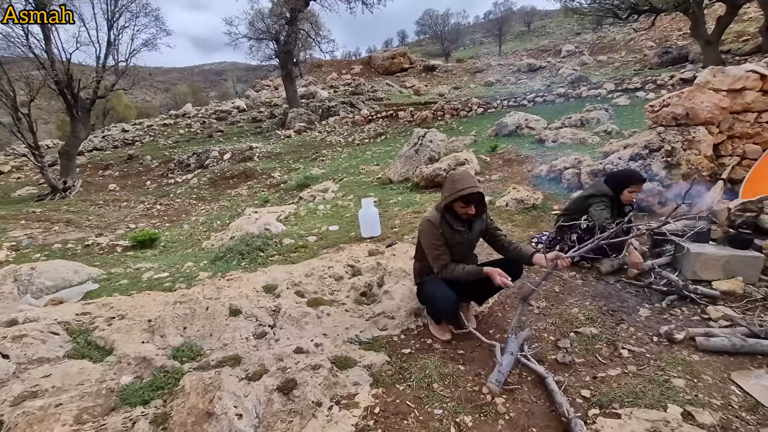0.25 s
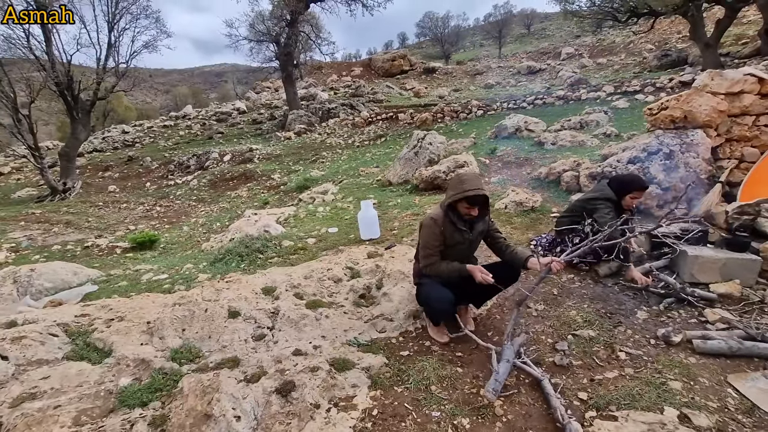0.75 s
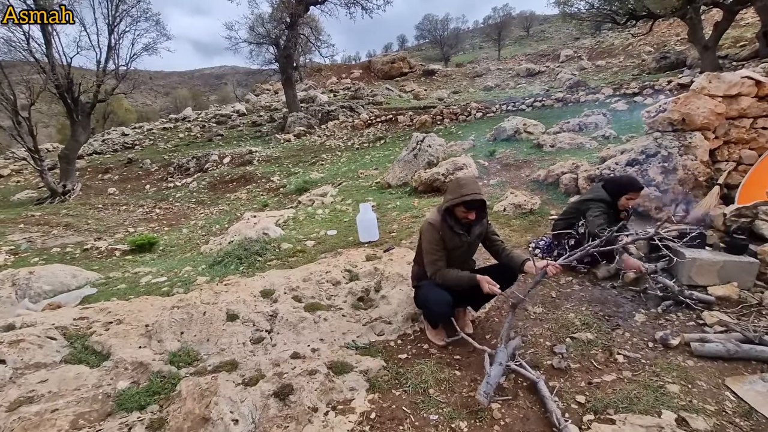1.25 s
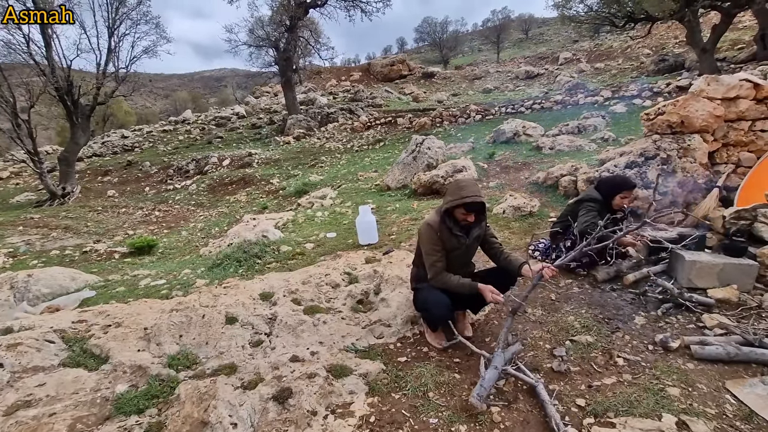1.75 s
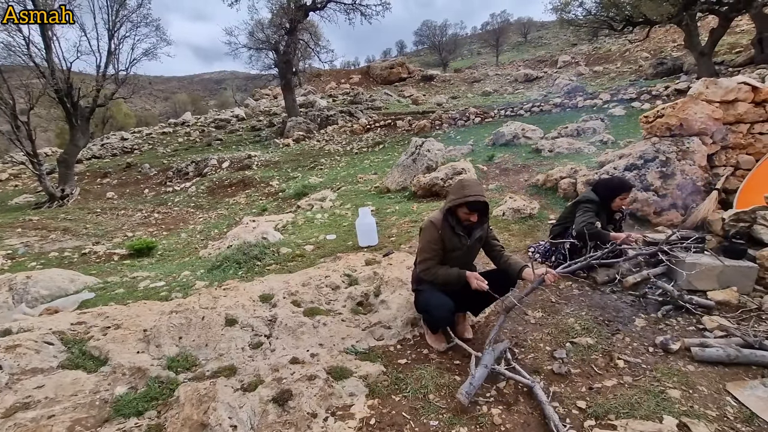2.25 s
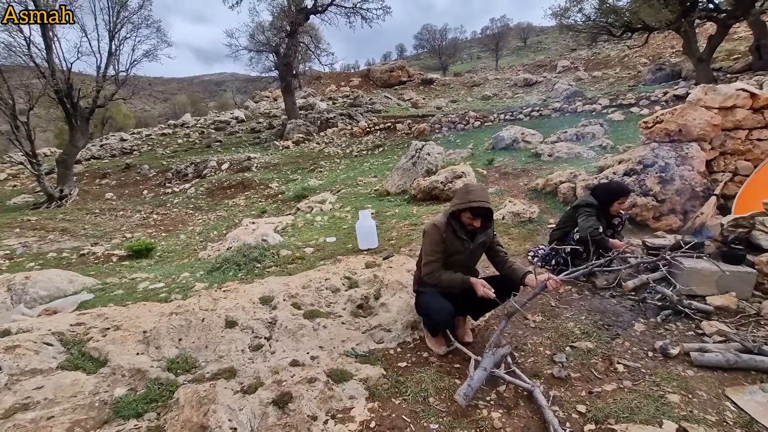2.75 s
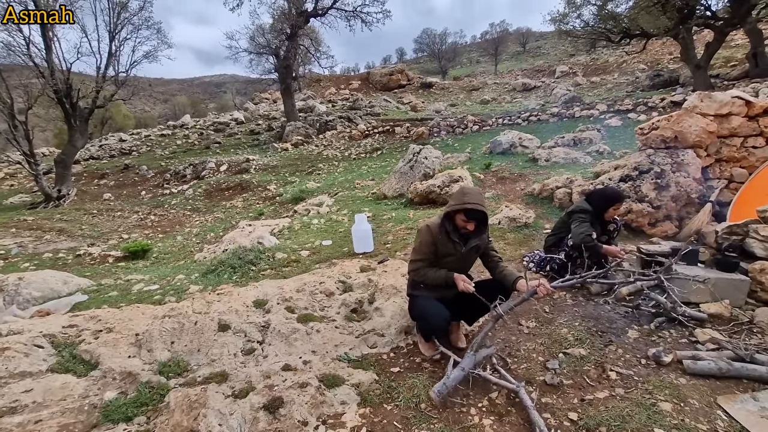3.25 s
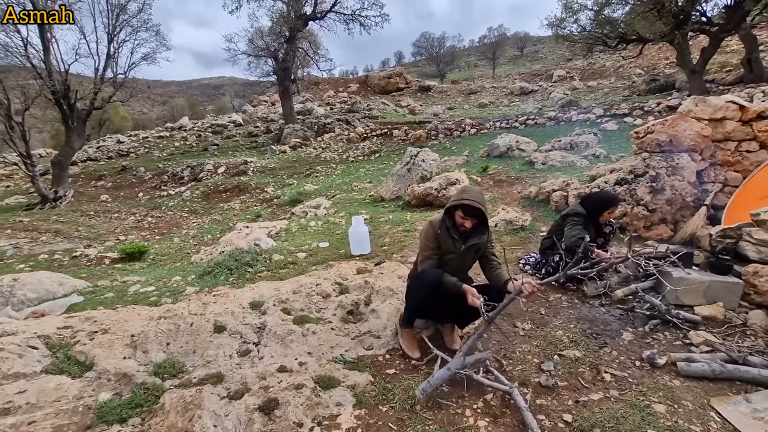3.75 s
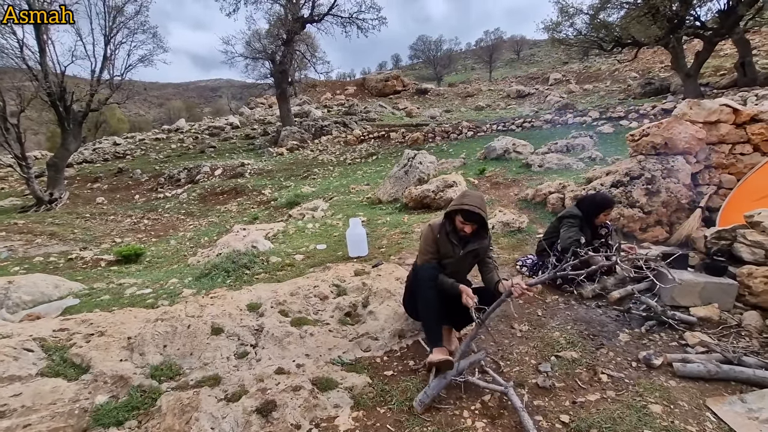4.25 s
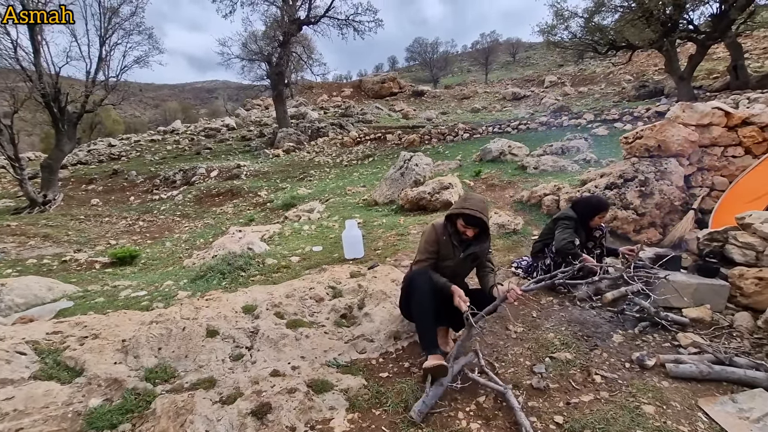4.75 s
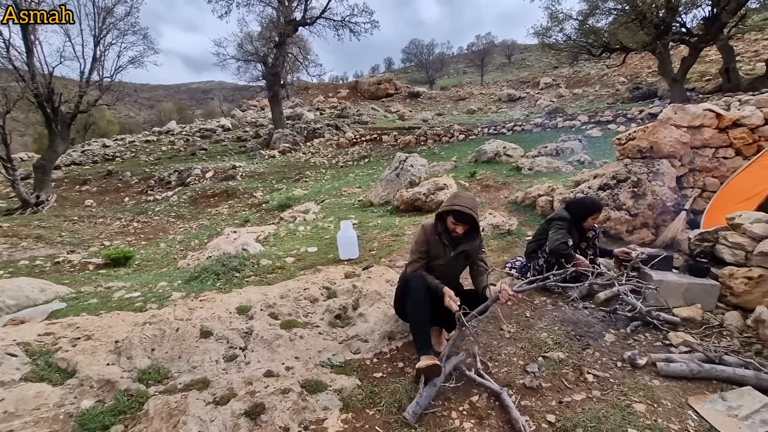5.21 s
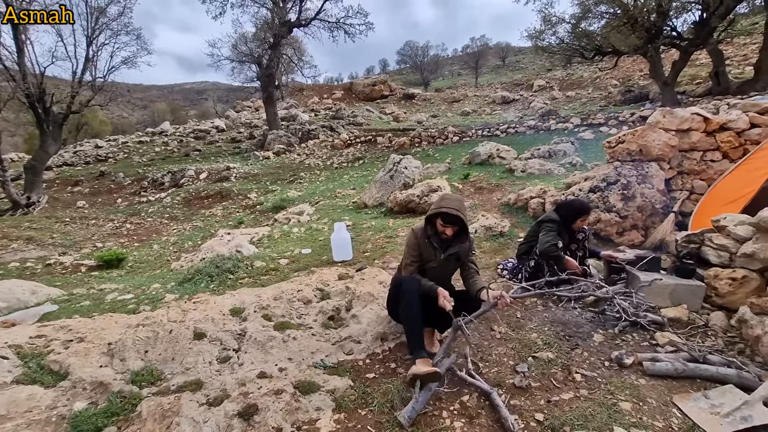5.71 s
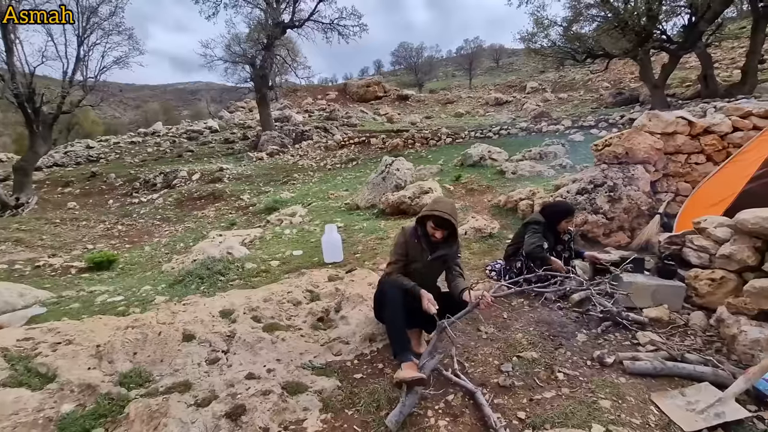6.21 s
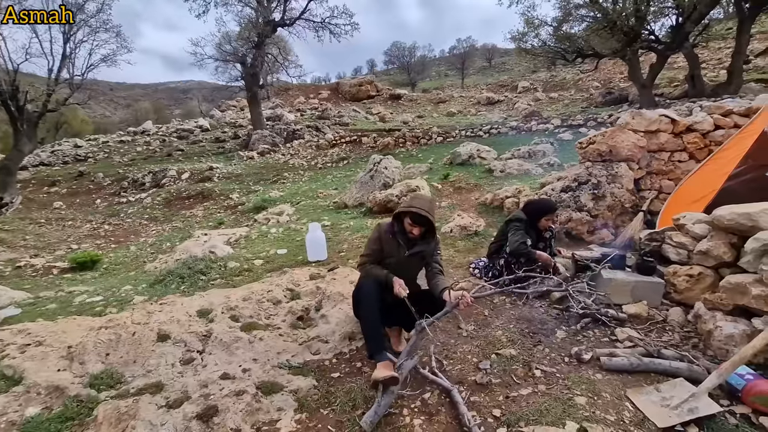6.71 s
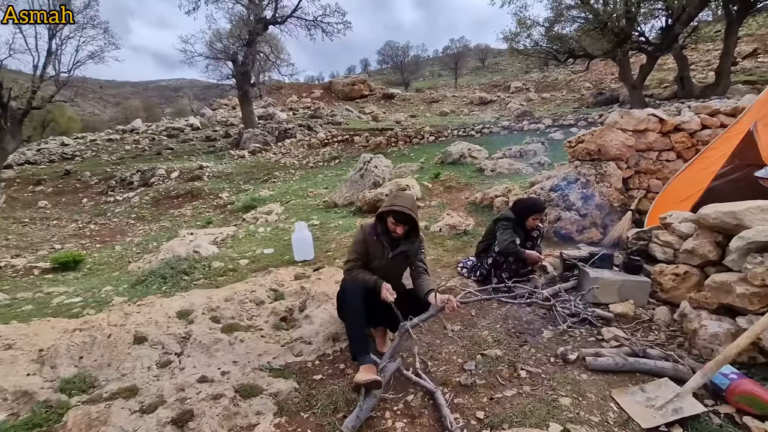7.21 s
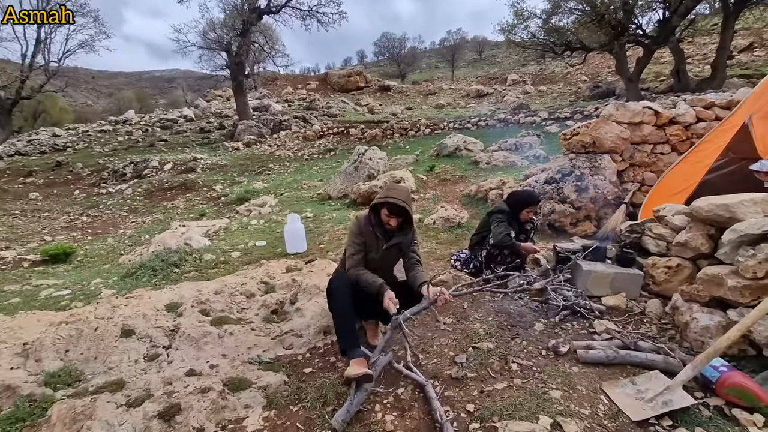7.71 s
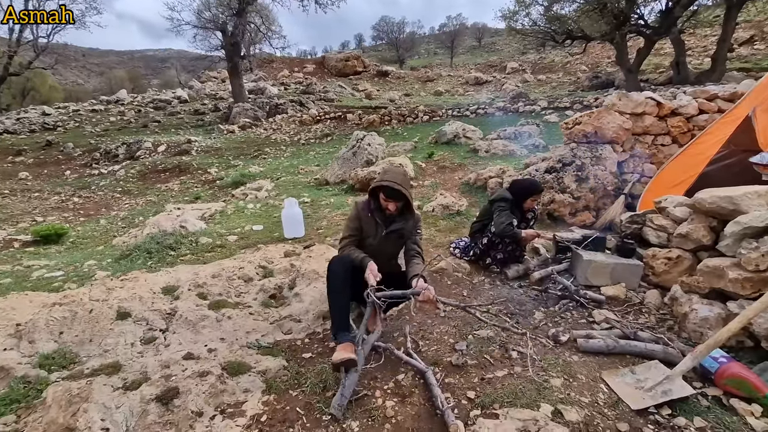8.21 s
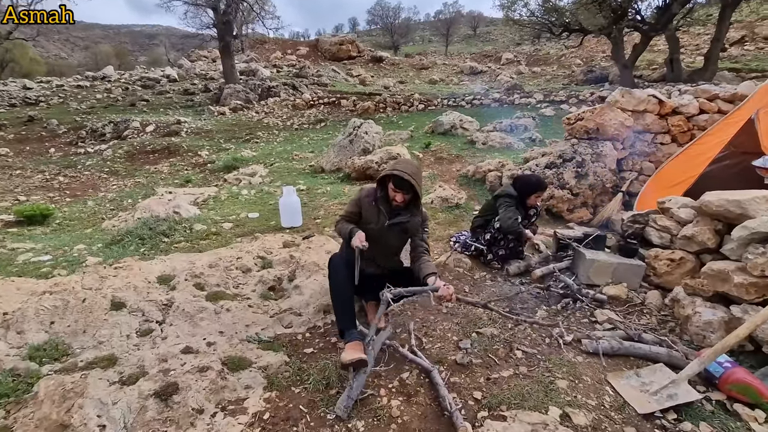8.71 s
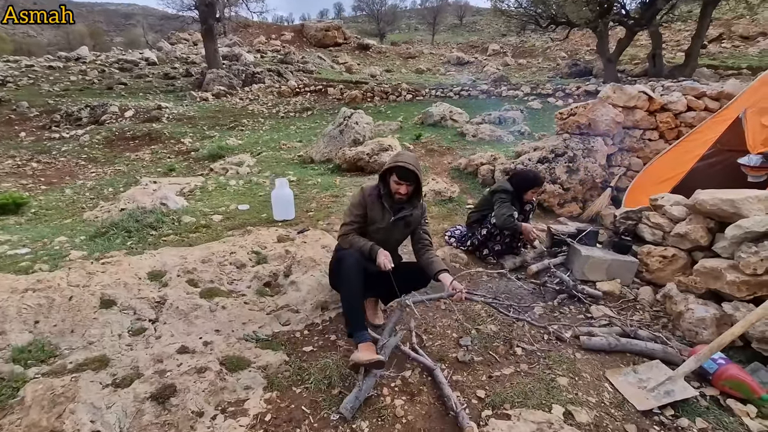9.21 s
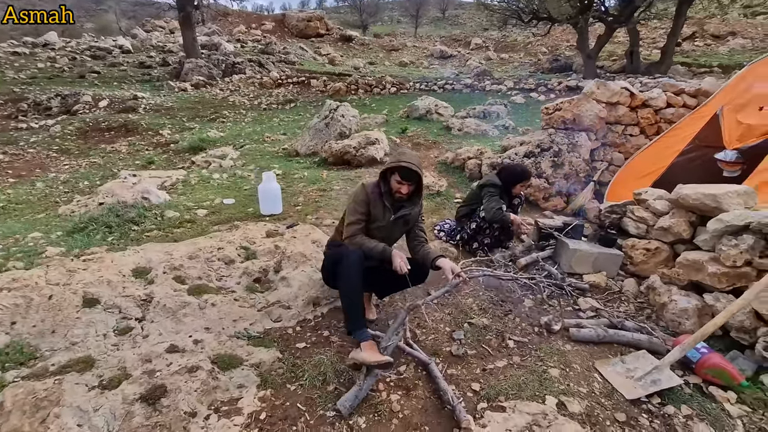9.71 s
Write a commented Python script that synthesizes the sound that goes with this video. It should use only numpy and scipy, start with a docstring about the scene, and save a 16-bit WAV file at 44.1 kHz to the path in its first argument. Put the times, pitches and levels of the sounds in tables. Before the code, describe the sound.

Quick, dry, scratchy saw strokes run through wood on an open hillside, interrupted by a snap and then a quieter gap with only a couple of strokes. Rougher, louder sawing returns with buzzing teeth and sharp cracks, then gives way to creaks, small snaps and twig ticks. Deep wind rumble swells unevenly against a handheld microphone; thin birds whistle far off, with almost no echo.

```python
"""Quick push and pull strokes of a small hand saw rasp through a dry branch, a few metres off on an open hillside.
The teeth tear fibres and ring the wood; the blade catches, the branch cracks and splinters, twigs tick.
Gusts buffet the two microphone ports, and small birds whistle far off over the soft rush of distant air.
Wood sounds are crowds of tiny fractures through resonant filters; wind is filtered noise with pressure swings;
birds are gliding sines; stones and ground add a faint tail to the wood and the birds."""
import sys
import numpy as np
from scipy import signal
from scipy.fft import rfft, irfft
from scipy.io import wavfile
from scipy.ndimage import uniform_filter1d

SR = 44100
rng = np.random.default_rng(int(sys.argv[2]) if len(sys.argv) > 2 else 0)


def to_wav(s):
    """Save 16-bit WAV."""
    ch = np.atleast_2d(s).T  # columns
    pcm = np.round(np.clip(ch, -1, 1) * 32767)  # PCM
    wavfile.write(sys.argv[1], SR, pcm.astype(np.int16))


N = 439236
T = np.arange(N) / SR  # time, s


def undb(db):
    """Decibels to gain."""
    return 10 ** (np.asarray(db) / 20)


def pan(left_minus_right_db):
    """Left and right gains of constant power."""
    half_db = np.atleast_1d(left_minus_right_db) / 2
    gains = undb(np.array([half_db, -half_db]))
    return gains / np.sqrt(np.mean(gains ** 2, axis=0))


def unit(x):
    """Scale to rms 1."""
    return x / np.sqrt(np.mean(x ** 2))


def band(x, lo_hz, hi_hz, order=2):
    """Butterworth band-pass."""
    return signal.sosfilt(signal.butter(order, [lo_hz, hi_hz], "band", fs=SR, output="sos"), x)


def ring(x, hz, width_hz):
    """One resonance, gain 1 at its centre."""
    return signal.lfilter(*signal.iirpeak(hz, hz / width_hz, fs=SR), x)


def colour(x, hz, db, rings=(), size=2048):
    """Causal filter from a spectrum with resonant bumps on top; white noise keeps its level."""
    f = np.fft.rfftfreq(size, 1 / SR) + 1
    gain = undb(np.interp(np.log(f), np.log(hz), db))
    for centre_hz, width_hz, ring_db in rings:
        gain = gain * (1 + undb(ring_db) / (1 + (2 * (f - centre_hz) / width_hz) ** 2))
    # folding the cepstrum onto positive time gives a minimum-phase response
    cepstrum = irfft(np.log(gain)) * np.where(np.arange(size) < size // 2, 2, 0)
    response = irfft(np.exp(rfft(cepstrum)))
    return signal.fftconvolve(x, response[None] / np.linalg.norm(response), axes=1)[:, :N]


def walk(rate_hz):
    """Smoothed random steps, rms 1."""
    k = int(SR / rate_hz)
    steps = np.repeat(rng.standard_normal(N // k + 1), k)
    return unit(uniform_filter1d(uniform_filter1d(steps, k), k)[:N])


def swell(at, db, length):
    """A smooth rise and fall of level around a moment."""
    return undb(db) * np.exp(-np.minimum((2 * (T - at) / length) ** 2, 60))


def burst(at, rise, t60):
    """Stress builds up to a break and dies away."""
    before = ((T - at) / rise) ** 2
    after = (T - at) * np.log(1000) / t60
    return np.exp(-np.minimum(np.where(T < at, before, after), 60))


def fibres(rate, spread_db, lag=0., split_hz=3000):
    """Tiny fractures of uneven size; both ports share the lows, the treble scatters differently to each."""
    happens = rng.random(N) < rate / SR  # rate in fractures per second
    sizes = happens * undb(spread_db * np.minimum(rng.standard_exponential(N), 4))
    shared, *own = rfft(sizes * rng.standard_normal((3, N)))
    f = np.fft.rfftfreq(N, 1 / SR)
    alike = .93 / (1 + (f / split_hz / 2) ** 2)
    arrival = np.exp(-2j * np.pi * f * np.array([[lag], [0]]))  # left port hears the shared part lag s later
    return unit(irfft(np.sqrt(alike) * shared * arrival + np.sqrt(1 - alike) * np.array(own), N))


def timber(grains, force, body, spectrum, rings=(), body_hz=2700):
    """Fractures ring the branch: its body sounds below the splintering treble, each with its own strength."""
    low = signal.sosfiltfilt(signal.butter(4, body_hz, fs=SR, output="sos"), grains)
    return colour(low * body + (grains - low) * force, *np.transpose(spectrum), rings)


def hillside(x, wet_db=-17, t60=0.2, size=16384):
    """Stones and ground scatter a faint, short tail."""
    t = T[:size]
    noise = band(rng.standard_normal((2, size)), 290, 4000, order=1)
    tail = noise * undb(-60 * t / t60) * (t > .003)
    return x + undb(wet_db) * signal.fftconvolve(x, tail / np.linalg.norm(tail[0]), axes=1)[:, :N]


# colour of the distant air: (pitch_hz, relative level_db)
AIR_COLOUR = [(100, -7), (350, 2), (600, -4), (950, -5.5), (1200, -5), (1700, -5.5), (2100, -14),
              (2700, -26), (6000, -26), (11000, -29), (16000, -26)]
# strength of the distant air, before its slow swelling: (time_s, level_db)
AIR_STRENGTH = [(0, -59), (2.4, -56.5), (3.7, -60), (4.8, -62), (5.4, -56.5), (7.1, -55.5), (8.2, -60.5),
                (8.8, -58), (9.3, -60), (9.96, -58)]


def air():
    """A soft, slowly swelling rush from the valley."""
    noise = fibres(rate=37000, spread_db=3, split_hz=230)
    swell_db = .8 * walk(2) + .8 * walk(14)
    level_db = np.interp(T, *np.transpose(AIR_STRENGTH)) + swell_db
    return colour(noise, *np.transpose(AIR_COLOUR)) * undb(level_db)


# breeze between gusts, before the rumble and upper gains: (time_s, flow level_db)
BREEZE_FLOW = [(0.0, -45.5), (2.0, -39.5), (2.8, -37), (3.5, -43.5), (4.35, -41.5), (4.85, -44.5),
               (5.3, -53), (5.7, -47), (6.4, -40), (6.9, -58), (7.1, -51), (7.35, -38.5), (7.85, -52),
               (8.3, -43.5), (8.55, -50), (9.3, -43.5), (9.5, -51), (9.96, -44)]
# gusts across the ports, before the same gains: (peak_s, flow level_db, length_s, left_minus_right_db)
GUST_FLOW = [(0.015, -29, 0.16, 2), (0.367, -27.5, 0.34, 15), (0.662, -33, 0.19, 30),
             (0.956, -39, 0.13, -3), (1.095, -28, 0.089, 2.5), (1.426, -28, 0.22, 30),
             (1.6, -26.5, 0.17, -8), (1.742, -29.5, 0.093, -2.5), (2.13, -29, 0.14, 24),
             (2.213, -24.5, 0.049, -4), (2.37, -27, 0.17, 2.5), (2.61, -32, 0.29, 5),
             (2.96, -31.5, 0.12, 10), (3.042, -22, 0.066, -11), (3.17, -32.5, 0.12, -12),
             (4.11, -28, 0.31, 12), (4.489, -30, 0.13, 27), (4.604, -30.5, 0.1, 11),
             (4.691, -33.5, 0.12, -24), (5.11, -33.5, 0.24, 20), (5.358, -33.5, 0.326, 5),
             (6.07, -33.5, 0.18, -27), (6.624, -27.5, 0.25, 8), (6.837, -25.5, 0.26, 7),
             (7.477, -30, 0.045, 20), (8.925, -32.5, 0.13, 7), (9.265, -31, 0.25, -4.5),
             (9.673, -31, 0.24, 32), (9.938, -24, 0.054, 16)]
# eddies that slap a port: (time_s, swing level_db, left_minus_right_db)
EDDY_SLAPS = [(0.267, -12.5, 25), (0.367, -9, 28), (0.427, -13.5, 29), (0.527, -22.5, 31),
              (0.982, -18, 22.5), (1.224, -19.5, 30), (1.385, -20, 28), (2.204, -17.5, -11),
              (2.906, -18.5, -12), (2.958, -16, -10), (4.013, -21, 19), (4.057, -17, 21),
              (4.111, -24.5, 18), (4.611, -23, 19), (4.914, -29.5, 17), (5.241, -21.5, 26),
              (6.569, -20, 22.5), (6.738, -10.5, 29), (6.823, -15.5, 23), (6.872, -20, 18),
              (7.264, -21, 15), (8.713, -21, 30), (8.864, -21, 27), (9.181, -12.5, -34),
              (9.226, -22.5, -23)]
SLAP_S = 0.0022  # time scale of the pressure swing
GUST_REF_DB, UPPER_GROWTH = -32.5, 0.26  # above this flow level the upper rumble gains so many extra dB per dB
EDDY_RISE_S, EDDY_T60_S, EDDY_DB = .016, 0.22, -11  # turbulence around a slap; flow level relative to the slap


def wind(rumble_db=1, upper_db=-19, wake_upper_db=-7, flutter_db=4, unsteady_db=3.5):
    """Turbulence is unrelated at the ports and brighter in strong gusts; eddies push and pull, then leave a wake."""
    breeze = undb(np.interp(T, *np.transpose(BREEZE_FLOW)))
    gust_power = sum((swell(at, db, length) * pan(side_db)) ** 2 for at, db, length, side_db in GUST_FLOW)
    wake_power = sum((undb(db + EDDY_DB) * burst(at, EDDY_RISE_S, EDDY_T60_S) * pan(side_db)) ** 2
                     for at, db, side_db in EDDY_SLAPS)
    # the flow comes in lumps, several a second
    lump_swing = unit(band(np.array([walk(40), walk(40)]), 4.18, 12.9))
    lumps = unit(undb(unsteady_db * lump_swing))
    flow = np.sqrt((breeze ** 2 + gust_power) * lumps ** 2 + wake_power)
    growth = (flow / undb(GUST_REF_DB)) ** UPPER_GROWTH
    upper_level = np.hypot(flow * growth * undb(upper_db), np.sqrt(wake_power) * undb(wake_upper_db))

    low = colour(rng.standard_normal((2, N)), [15, 28, 45, 70, 100, 122, 165, 260, 500],
                 [-43.5, -9.0, 3.5, 2.5, -4.5, -1.0, -20.5, -39.5, -77.5])
    low = low / np.sqrt(uniform_filter1d(low ** 2, SR // 20, axis=1))  # the flow alone sets the rumble's strength
    upper = colour(rng.standard_normal((2, N)), [80, 165, 250, 330, 450, 700, 1500],
                   [-23.0, 2.5, -5.5, -7.5, -25, -35, -69])
    upper = upper * unit(undb(flutter_db * walk(45)))
    out = low * undb(rumble_db) * flow + upper * upper_level

    for at, db, side_db in EDDY_SLAPS:
        i = np.flatnonzero(abs(T - at) < 10 * SLAP_S)
        u = (T[i] - at) / SLAP_S
        push_pull = -2 * np.tanh(u) / np.cosh(u) ** 2
        out[:, i] += push_pull * undb(db) * pan(side_db)
    return out


# far bird notes, before waver and flutter: (start_s, length_s, start_hz, end_hz, level_db)
BIRD_NOTES = [(-.03, 0.057, 3780, 3740, -58), (0.112, 0.066, 4630, 4640, -56),
              (.18, 0.063, 6470, 6700, -61.5), (0.275, .04, 3500, 3400, -58),
              (0.348, 0.097, 3624, 3770, -56), (4.559, 0.055, 6900, 5240, -79),
              (4.667, 0.068, 6600, 4940, -72), (4.808, 0.064, 5940, 4870, -75),
              (9.254, 0.064, 7100, 6200, -78), (9.402, .09, 6960, 6050, -77),
              (9.573, 0.089, 6350, 4900, -71.5)]


def birds(waver=0.01):
    """Thin whistles that bend faster towards their end and flutter on their way across the slope."""
    out = np.zeros(N)
    wobble = 1 + waver * walk(900)
    for at, length, start_hz, end_hz, db in BIRD_NOTES:
        i = np.flatnonzero((T > at) & (T < at + length))
        u = (T[i] - at) / length
        hz = (start_hz + (end_hz - start_hz) * (u + 2 * u ** 3) / 3) * wobble[i]
        whistle = np.sin(2 * np.pi * np.cumsum(hz) / SR)
        out[i] += undb(db) * 2 * np.sin(np.pi * u) * whistle
    return hillside(out * undb(2 * walk(120)) * pan(0.5), wet_db=-5.5, t60=.25)


# dry twigs shifting, before the twig gain: (peak_s, level_db, length_s)
TWIG_RUSTLES = [(0.145, -53, 0.076), (2.306, -62, 0.0656), (2.976, -73, 0.085), (3.714, -64, 0.077),
                (4.26, -57, .04), (4.63, -57.5, 0.121), (4.997, -60, 0.024), (5.111, -47, 0.029),
                (5.14, -78.5, 0.106), (5.46, -62, 0.44), (7.877, -57.5, 0.27), (8.69, -73, .16),
                (9.047, -56, 0.12), (9.237, -67, 0.25), (9.58, -63, 0.14), (9.727, -49, 0.043),
                (9.96, -55, 0.113)]
# colour of snapping dry wood, twigs and branch alike: (pitch_hz, relative level_db)
SNAP_COLOUR = [(250, 1.5), (520, -0.5), (800, -5), (1100, 4.5), (1500, 0), (2200, -2), (2900, -4),
               (3500, -1), (4400, -1.5), (5800, -0.5), (8500, -1), (11000, -5.5), (15500, -0.5)]
TWIG_REST_DB = -74  # the litter ticks faintly between rustles, before the twig gain


def twigs(twig_db=-6):
    """Dry twigs tick in sparse fractures and rub in dense ones."""
    level = undb(TWIG_REST_DB) + sum(swell(*rustle) for rustle in TWIG_RUSTLES)
    ticks = fibres(rate=440, spread_db=5.0)
    rubbing = undb(1.0) * fibres(rate=25000, spread_db=3)
    return undb(twig_db) * timber(ticks + rubbing, level, level, SNAP_COLOUR)


# dull knocks of the branch: (start_s, level_db, pitch_hz, t60_s)
BRANCH_KNOCKS = [(0.572, -32, 1240, 0.029), (2.157, -46, 1110, 0.017), (2.947, -24, 1100, 0.033),
                 (7.693, -28.5, 402.5, 0.026), (7.739, -40, 874, 0.025), (7.922, -39, 546, 0.098),
                 (9.141, -28.5, 650, 0.023)]
# modes of the knocked branch: (multiple of the pitch, relative level_db)
BRANCH_MODES = [(.62, -9), (1, 0.5), (1.33, -3), (1.8, -23)]


def knocks(size=4096):
    """The branch jolts against the hand or the ground and its modes die quickly."""
    out, t = np.zeros(N), T[:size]
    for at, db, hz, t60 in BRANCH_KNOCKS:
        modes = sum(undb(mode_db) * np.sin(2 * np.pi * hz * k * t) for k, mode_db in BRANCH_MODES)
        i = int(at * SR)
        out[i:i + size] += undb(db - 60 * t / t60) * modes / 2
    return out * pan(-1)


# cracks of wood and catches of the blade, before the timber gain: (peak_s, level_db, t60_s, relative body_db)
WOOD_CRACKS = [(0.173, -40.5, 0.026, -23), (0.598, -40, 0.069, -4), (2.148, -24, 0.029, -2),
               (2.1588, -23, 0.021, 2), (2.883, -41.5, .015, 6), (4.294, -39.5, .055, -13),
               (4.408, -49.5, 0.064, 12), (4.423, -40.5, 0.063, 6.5), (5.165, -54, 0.081, -9),
               (6.029, -34, 0.049, -9), (6.274, -19, 0.025, -6), (6.322, -25.5, 0.051, -5),
               (6.604, -29, 0.086, -9), (6.88, -36.5, 0.067, -4), (7.169, -24.5, 0.028, -12),
               (7.457, -38, 0.079, 5.5), (7.607, -41, 0.043, 15), (7.657, -26, .055, -18),
               (7.671, -31, 0.048, 1.5), (7.739, -44, 0.12, 10), (7.762, -51, 0.079, -1),
               (7.812, -44.5, .024, -2), (7.832, -28, 0.013, -15), (7.912, -33.5, 0.074, -4),
               (7.927, -42, 0.096, 3.5), (8.383, -37, 0.026, -19), (8.597, -38, 0.1, -16),
               (8.642, -47.5, .05, -13), (8.684, -47.5, .04, 2), (8.948, -44.5, .027, 6),
               (8.986, -37, 0.062, -1), (9.07, -40.5, 0.045, -9), (9.104, -47, 0.014, -9),
               (9.137, -44.5, 0.073, 0.5), (9.519, -41.5, 0.067, 3.5), (9.605, -57, .055, -4),
               (9.631, -48, 0.038, -3), (9.86, -27.5, 0.021, -9.5), (9.899, -44, 0.032, 3)]
# tears and scrapes, each with a ringing mode, before the timber and ring gains:
# (peak_s, level_db, rise_s, t60_s, relative body_db, left_minus_right_db, ring_hz, relative ring_db)
RINGING_SCRAPES = [(4.305, -46.5, 0.018, 0.45, -20, -1, 2350, -2),
                   (8.537, -44, 0.0026, 0.32, 4.5, 1, 2420, 1.5),
                   (8.594, -37.5, 0.031, 0.19, -2.5, -3, 3480, -23),
                   (9.79, -41, 0.05, 0.085, 0, -2.5, 1020, -14),
                   (9.807, -27.5, 0.012, 0.037, -20, -3, 5850, 2),
                   (9.818, -29.5, 0.012, 0.026, -18, 0, 3330, -4)]
CRACK_RISE_SHARE, CRACK_PAN_DB = .04, -1  # build-up time as a share of the t60; left minus right


def breaking(ring_width_hz=110, timber_db=2, ring_db=-4):
    """Cracks and tears are avalanches of fractures; each scrape sets a mode ringing."""
    force, body, sing = np.zeros((3, 2, N))
    grains = fibres(rate=18000, spread_db=2.5, lag=.00005) * undb(1.8 * walk(350))
    cracks = [(at, db, CRACK_RISE_SHARE * t60, t60, body_db, CRACK_PAN_DB)
              for at, db, t60, body_db in WOOD_CRACKS]
    for at, db, rise, t60, body_db, side_db, *mode in cracks + RINGING_SCRAPES:
        shape = undb(db) * burst(at, rise, t60) * pan(side_db)
        force += shape
        body += shape * undb(body_db)
        if mode:
            mode_hz, mode_db = mode
            sing += unit(ring(grains, mode_hz, ring_width_hz)) * shape * undb(mode_db)
    return undb(timber_db) * timber(grains, force, body, SNAP_COLOUR, body_hz=3100) + undb(ring_db) * sing


BLADE_REFLECTION = .3  # gain of each return


def blade_echoes(x, position):
    """Bending waves return from the tip and the handle; both paths change as the blade slides: resonances sweep."""
    r = BLADE_REFLECTION
    for delay in (.0026 + .0009 * position, .0049 - .0011 * position):  # s
        x = x + np.array([r * np.interp(T - delay, T, c) + r ** 2 * np.interp(T - 2 * delay, T, c) for c in x])
    return unit(x)


# saw strokes, push and pull in turn, before the rasp and chatter gains: (start_s, end_s, level_db)
SAW_STROKES = [(0.233, 0.397, -43.5), (0.416, 0.57, -44), (0.577, 0.732, -39), (0.742, 0.882, -42.5),
               (0.893, 1.044, -40.5), (1.048, 1.184, -40.5), (1.199, 1.339, -41.0), (1.347, 1.476, -42.5),
               (1.503, 1.659, -40.0), (1.657, 1.79, -41.5), (1.813, 1.961, -39.5), (1.961, 2.104, -40),
               (2.105, 2.311, -41.0), (2.387, 2.527, -45.5), (2.526, 2.683, -43.5), (2.677, 2.85, -44.5),
               (2.875, 3.025, -44.5), (3.131, 3.255, -48), (3.309, 3.5, -46.5), (4.261, 4.406, -41.5),
               (4.414, 4.575, -42), (5.673, 5.841, -41), (5.848, 6.002, -41.5), (6.005, 6.142, -38.5),
               (6.139, 6.273, -43.5), (6.295, 6.439, -39), (6.433, 6.561, -40.5), (6.566, 6.711, -39),
               (6.708, 6.847, -39.5), (6.855, 7.005, -38.5), (6.999, 7.125, -40), (7.147, 7.285, -36),
               (7.28, 7.408, -38.5), (7.428, 7.577, -36.5), (7.573, 7.703, -36)]
# colour of the sawn branch: (pitch_hz, first cut level_db, second cut level_db), relative
WOOD_COLOUR = [(236, -5.5, -2), (486, -2, -7.5), (676, -4, -4.5), (961, -1, -6.5), (986, 3.5, 4.5),
               (1330, 2.5, -2), (1510, -1.5, -6.5), (1846, -0.5, -1), (3057, -8, -9.5), (3320, -3.5, -4),
               (4160, -6, -5), (4730, -9, -2.5), (11600, -10, -7), (15070, -13.5, -6)]
# rings of the blade and branch: (pitch_hz, width_hz, first cut ring_db, second cut ring_db), over the wood colour
BLADE_RINGS = [(1113, 130, -15.5, 0.5), (1975, 125, -9, -1.5), (2540, 110, -18, -8.5), (3410, 98, -6.5, -2),
               (4780, 130, 4.5, -3), (5320, 300, 1.5, -30), (6040, 140, -0.5, -21), (8570, 630, -3.5, -2.5),
               (14910, 1040, 7, 4.5)]
# pressure gained over a stroke, one row per cut: (push_db, pull_db)
STROKE_LEAN = [(5, 7), (2.5, 6.5)]
SECOND_CUT_S, DEEP_FROM_S = 5.5, 6.27  # strokes after these times belong to the second cut, and cut deep
TOOTH_HZ, STROKE_S = 232, .145  # top tooth rate, before wavering, in a stroke this long; shorter ones are faster
SHALLOW_CHATTER_DB = -17  # tooth chatter relative to the stroke, before the chatter gain
DEEP_CHATTER_DB = (5, -5.5)  # the same for push and pull once the weakened branch chatters


def saw(strokes, cut, lag, rasp_db, body_db, tooth_depth, pan_db, swell_power=1.35, judder_db=2.16,
        chatter_gain_db=-10):
    """The blade speeds up and stops in every stroke; each passing tooth tears fibres and kicks the branch."""
    bite, buzz, tooth_hz, position = np.zeros((4, N))
    for k, (start, end, db) in enumerate(strokes):
        i = np.flatnonzero((T > start) & (T < end))
        travel = (T[i] - start) / (end - start)
        speed = np.sin(np.pi * travel)
        position[i] = (1 + (-1) ** k * np.cos(np.pi * travel)) / 2  # push and pull alternate
        lean_db = STROKE_LEAN[cut][k % 2] * (travel - .5)
        bite[i] += speed ** swell_power * undb(db + lean_db)
        deep = (start + end) / 2 > DEEP_FROM_S
        chatter_db = DEEP_CHATTER_DB[k % 2] if deep else SHALLOW_CHATTER_DB
        # the teeth chatter once the blade is pressed in
        buzz[i] += undb(db + chatter_db) * np.exp(-((travel - .6) / 0.14) ** 2)
        tooth_hz[i] = TOOTH_HZ * STROKE_S / (end - start) * speed ** 0.36

    phase = np.cumsum(tooth_hz * (1 + .025 * walk(150))) / SR % 1
    tooth = np.exp(-phase / 0.51)  # a sharp kick that fades until the next tooth
    grains = fibres(rate=24000, spread_db=1.2, lag=lag)
    grains = grains * (1 - tooth_depth + 2 * tooth_depth * tooth) * undb(judder_db * walk(90))

    rings = [(hz, width_hz, ring_db[cut]) for hz, width_hz, *ring_db in BLADE_RINGS]
    spectrum = [(hz, level_db[cut]) for hz, *level_db in WOOD_COLOUR]
    force = bite * pan(pan_db)
    body = bite * undb(body_db) * pan(-1.1)
    rasp = timber(blade_echoes(grains, position), force, body, spectrum, rings)
    chatter = unit(band(tooth, 156, 270)) + undb(-14.0) * unit(band(tooth, 500, 1170))
    return undb(rasp_db) * rasp + undb(chatter_gain_db) * chatter * buzz * pan(1.6)


def scene():
    """Distant air, wind and birds behind two cuts with their twigs, knocks and cracks."""
    first_strokes = [row for row in SAW_STROKES if row[0] < SECOND_CUT_S]
    second_strokes = [row for row in SAW_STROKES if row[0] > SECOND_CUT_S]
    first = saw(first_strokes, 0, lag=.00014, rasp_db=5.5, body_db=-2.5, tooth_depth=0.21, pan_db=-0.67)
    second = saw(second_strokes, 1, lag=.00002, rasp_db=8, body_db=-1.5, tooth_depth=0.3, pan_db=0.4)
    wood = hillside(first + second + breaking() + twigs() + knocks())
    return air() + wind() + birds() + wood


PORT_LOW_HZ, TOP_HZ = 33.7, 15900  # edges of what the microphones pass on


def record(dry):
    """The small microphones lose the deepest bass and the phone cuts the top."""
    heard = signal.sosfilt(signal.butter(2, PORT_LOW_HZ, "high", fs=SR, output="sos"), dry)
    return signal.sosfilt(signal.ellip(10, .2, 80, TOP_HZ, fs=SR, output="sos"), heard)


dry = scene()
out = record(dry)
to_wav(out)
```